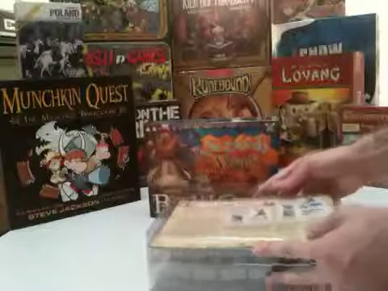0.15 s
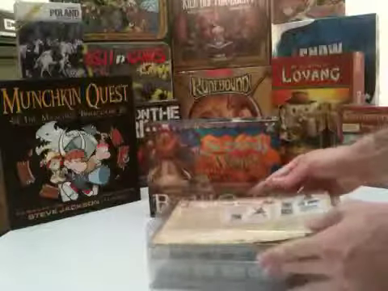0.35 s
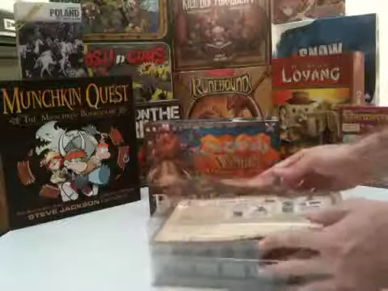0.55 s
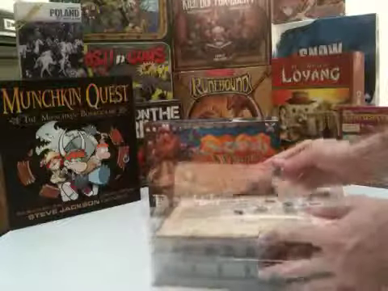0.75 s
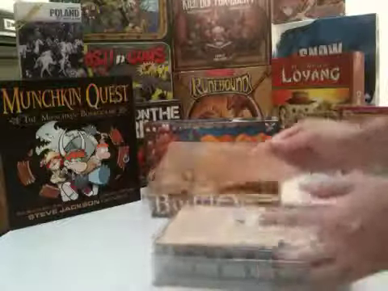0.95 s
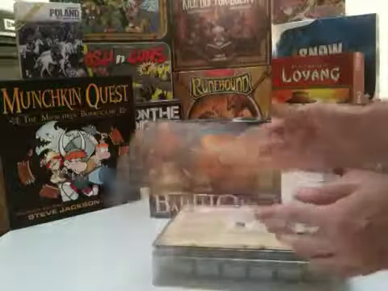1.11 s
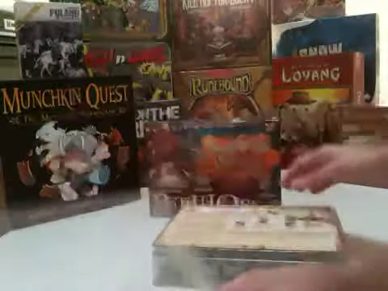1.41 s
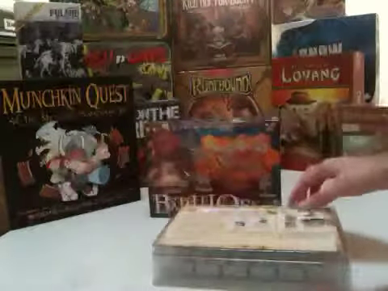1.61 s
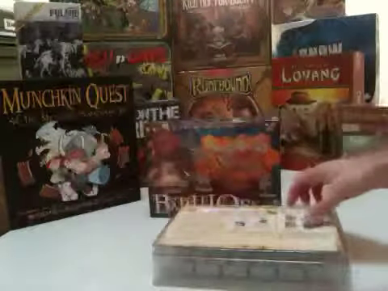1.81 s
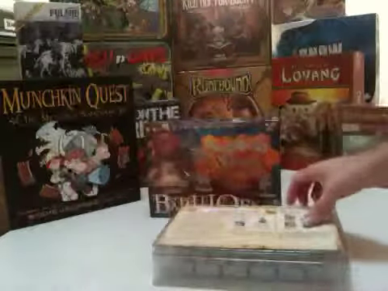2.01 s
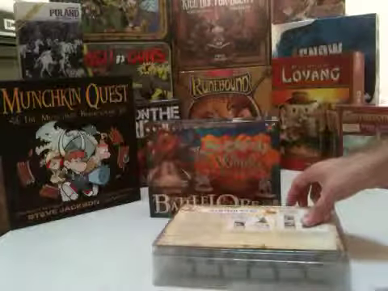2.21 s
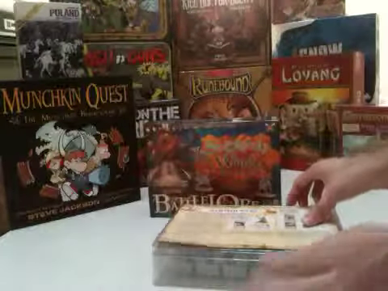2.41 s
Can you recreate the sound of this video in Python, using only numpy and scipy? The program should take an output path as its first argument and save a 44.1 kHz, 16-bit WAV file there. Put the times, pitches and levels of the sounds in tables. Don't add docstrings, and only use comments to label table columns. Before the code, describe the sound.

Hands work a thin plastic lid off a hollow box with soft scrapes, ticks and dull knocks, a near pause, then sharper taps and crisp paper snaps, close in a small room with steady hiss.

```python
import sys
import numpy as np
from scipy import signal
from scipy.fft import rfft, irfft
from scipy.io import wavfile
from scipy.ndimage import uniform_filter1d, minimum_filter1d

SR = 44100
rng = np.random.default_rng(int(sys.argv[2]) if len(sys.argv) > 2 else 0)


def transcribe(u):
    v = np.clip(np.atleast_2d(u).T, -1, 1)
    q = np.round(v * 32767).astype(np.int16)
    wavfile.write(sys.argv[1], SR, q)


def field_ratio(decibels):
    return 10 ** (np.asarray(decibels, dtype=float) / 20)


N = 112454

TICK_HZ, TICK_BODY_HZ = 11940, 3610


def band(x, hz, width_hz):
    return signal.lfilter(*signal.iirpeak(hz, hz / width_hz, fs=SR), x)


def ring(x, hz, t60):
    pole = np.exp(2j * np.pi * hz / SR - np.log(1000) / (t60 * SR))
    return signal.lfilter([1], [1, -pole], x).imag


def decay(t, t60):
    return 1000. ** (-t / t60)


def unit(x):
    return x / np.sqrt(np.mean(x ** 2))


def add(track, s, sound):
    i = int(s * SR)
    track[i:i + len(sound)] += sound[:N - i]


def curve(rows, index):
    return np.interp(np.arange(N) / SR, [r[0] for r in rows], [r[index] for r in rows])


def ragged(length, depth):
    return 1 + depth * unit(uniform_filter1d(rng.standard_normal(length), size=60))


def box(x):
    # (pitch [Hz], level [dB], t60 [s])
    box_tones = [(327, -6, 0.037), (433, 2.5, 0.028), (467.5, 3.5, 0.041), (609.4, 1, 0.053),
                 (780, 3, 0.031), (937, 2, 0.049), (1118, -2.5, 0.086), (1385, 0, 0.012), (1700, -6, 0.11)]
    detune, scatter_db = .05, 2.
    grip = rng.standard_normal((len(box_tones), 2))
    out = 0
    for k, (hz, db, t60) in enumerate(box_tones):
        tone = ring(x, hz * (1 + detune * grip[k, 1]), t60)
        out = out + (-1) ** k * field_ratio(db + scatter_db * grip[k, 0]) * tone
    return out


def slips(per_s):
    scatter_db = 2 * np.minimum(rng.exponential(size=N), 2)
    size = field_ratio(scatter_db) * np.tanh(rng.standard_normal(N))
    return size * (rng.random(N) < per_s / SR)


def slide():
    # (time [s], pressure [dB], dryness [dB])
    rubbing = [(0, -50, -13), (.2, -54.5, -8), (.5, -56, -12), (.54, -49.5, -9), (.81, -63.5, -11),
               (.856, -43, -12), (.862, -35.5, -18.5), (1.06, -53, 0.5), (1.08, -48.5, -13),
               (1.27, -64, -21), (1.3, -80, -41), (1.5, -83, -19), (1.865, -77, 5), (1.89, -62, -18),
               (2.03, -44, -11), (2.05, -41, -11), (2.2, -39, -16.5), (2.42, -61, -10.5)]
    slips_per_s, bursts_per_s, burst_db = 500, 280, 5.
    body_level_db, mid_level_db, dry_level_db = -13, -19, -3.5
    press = field_ratio(curve(rubbing, index=1))

    body = unit(sum(box(uniform_filter1d(slips(slips_per_s / 2), size=16)) for _ in range(2)))

    steps = np.tanh(rng.standard_normal(1000))
    bursts = field_ratio(burst_db * np.interp(np.arange(N) / SR * bursts_per_s, np.arange(1000), steps))
    fine = slips(12 * slips_per_s) * bursts
    bright = unit(band(band(fine, TICK_HZ, 11100.0), TICK_HZ, 11100.0))
    dull = unit(band(fine, TICK_BODY_HZ, 4100.0))
    rustle = bright + field_ratio(-7.0) * dull
    mid = unit(band(slips(4 * slips_per_s) * bursts, 2100.0, 2300.0))

    dryness = field_ratio(dry_level_db + curve(rubbing, index=2))
    return press * (field_ratio(body_level_db) * body + field_ratio(mid_level_db) * mid + dryness * rustle)


def hiss():
    # (pitch [Hz], level [dB per Hz])
    hiss_colour = [(20, -53), (60, -39), (130, 1), (340, 10.5), (1100, 2), (3600, -3.5), (6500, -5.5),
                   (13000, -3)]
    level_db = -61.5
    hz = np.maximum(np.arange(N // 2 + 1) * SR / N, 1)
    shape_db = np.interp(np.log(hz), np.log([r[0] for r in hiss_colour]), [r[1] for r in hiss_colour])
    spectrum = rfft(rng.standard_normal(N)) * field_ratio(shape_db) * (hz < 16500)
    return field_ratio(level_db) * unit(irfft(spectrum, N))


def ticks():
    # (time [s], peak level [dB], body level [dB], length [s])
    lid_ticks = [(0.037, -35, -26, 0.0034), (0.081, -35.5, -10.5, 0.0091), (0.142, -32.5, -11.5, 0.006),
                 (0.196, -37, -11, 0.0029), (.286, -34.5, -9, .003), (0.511, -40, 3.5, 0.0054),
                 (0.517, -39.5, 4, .004), (0.534, -34, -23, 0.0045), (0.569, -36, -11, 0.0026),
                 (0.702, -37, -9, .003), (0.826, -39.5, -5.5, 0.012), (0.859, -27, -22, 0.0013),
                 (0.869, -25, -22, 0.0039), (0.878, -28.5, -11, 0.014), (0.903, -28.5, -11.5, 0.014),
                 (0.916, -33.5, -4.5, 0.0068), (0.973, -39, -2, 0.0021), (1.027, -35, -5, 0.019),
                 (1.052, -42, -3, 0.0028), (1.552, -40, 0.5, 0.0022)]
    # (time [s], peak level [dB], body level [dB], length [s])
    paper_ticks = [(1.706, -34, -16, 0.0029), (1.719, -30.5, -15, 0.0035), (1.767, -30, -15, 0.0014),
                   (1.798, -33.5, -13, 0.0029), (1.803, -32, -13, 0.005), (1.8716, -33, -6, 0.0057),
                   (1.888, -36, -20, .002), (1.9765, -19, -22, 0.0009), (1.977, -30.5, -7.5, 0.003),
                   (2.0124, -19.5, -30, 0.0006), (2.0137, -19, -30, .0008), (2.038, -30.5, 2, 0.0027),
                   (2.1245, -30.5, -19, 0.0033), (2.156, -31, -29, 0.0008), (2.16, -25, -29, .0008),
                   (2.168, -40, -20, .001), (2.192, -27, -15, 0.001), (2.196, -31.5, -14, 0.0044),
                   (2.229, -26.5, -8, 0.001), (2.2375, -22.5, -27, 0.0013), (2.298, -41, -19, .002),
                   (2.2686, -26, -10, 0.0018), (2.34, -24.5, -10.5, 0.0015), (2.4247, -31, -10.5, 0.0054)]
    level_db, snap_db, width_hz = -10.5, 7.5, 6370
    out, t = np.zeros(N), np.arange(SR // 20) / SR
    for s, db, body_db, length in lid_ticks + paper_ticks:
        fade = t / max(length, .0003)
        crackle = np.exp(-fade) * (1 - np.exp(-4 * fade)) + np.exp(-8 * fade)
        burst = rng.standard_normal((2, len(t))) * crackle
        burst[:, 0] = field_ratio(snap_db) * min(1, 0.0028 / length)
        top = band(band(burst[0], TICK_HZ, width_hz), TICK_HZ, width_hz)
        body = field_ratio(body_db + 4.5) * band(burst[1], TICK_BODY_HZ, 4600.0)
        add(out, s, field_ratio(db + level_db) * (top + body))
    return out


def knocks():
    # (time [s], peak level [dB], pitch [Hz], hardness [dB])
    lid_knocks = [(0.139, -39, 477, -13), (0.163, -50.5, 476, -15), (0.377, -42.5, 370, -11.5),
                  (0.409, -49.5, 380, -9), (0.536, -46.5, 368, -14), (0.676, -49, 310, -28),
                  (0.771, -49, 720, -25), (0.855, -53, 470, -13), (0.868, -43, 480, 1.5),
                  (.8765, -40, 490, -14), (.883, -41.5, 428, -24), (0.890, -35.5, 400, -12),
                  (.903, -44, 527, -28), (0.921, -38.5, 400, -23), (.932, -46.5, 430, -21),
                  (.94, -54, 450, -25), (1.027, -38.5, 546, -7.5), (1.032, -42, 496, -10),
                  (1.04, -39, 359, -26), (1.069, -40.5, 403, -10), (1.082, -42, 406, -18),
                  (1.128, -43.5, 395, -30), (1.152, -42.5, 318, -35), (1.162, -45, 397, -28),
                  (1.178, -46, 308, -25), (1.244, -43.5, 380, -40), (1.283, -40.5, 386, -40),
                  (1.292, -40, 640, -57), (1.304, -36, 359, -44), (1.328, -39.5, 390, -52)]
    # (time [s], peak level [dB], pitch [Hz], hardness [dB])
    card_knocks = [(1.8703, -21.5, 602, -9.5), (1.8765, -39.5, 700, -5), (1.8845, -33.5, 560, -18),
                   (1.906, -35, 600, -34), (1.942, -42.5, 493, -7), (1.966, -49, 655, -26),
                   (2.001, -49, 620, -30), (2.036, -29.5, 530, -8.5), (2.045, -29, 490, -30),
                   (2.065, -39, 550, -29), (2.085, -38, 504, -30), (2.095, -22.5, 577, -13),
                   (2.098, -31.5, 556, -20), (2.103, -27.5, 590, -13.5), (2.1165, -29.5, 560, -1.5),
                   (2.121, -35, 540, -2), (2.13, -32, 475, -20), (2.153, -30.5, 410, -38),
                   (2.164, -36.5, 442, -11), (2.181, -31, 528, -27), (2.202, -37, 620, -13),
                   (2.235, -38, 450, -16), (2.287, -47, 576, -28), (2.338, -50, 507, -9)]
    # (pitch [Hz], level [dB], t60 [s])
    card_tones = [(1415, 4.5, .04), (1990, 12, 0.0083), (2300, -27, 0.009), (2900, -18, 0.013),
                  (3230, -32, 0.0097), (3800, -2, 0.013), (4950, -16, .01)]
    thud_db, box_db, edge_db = 5.5, -8, 1.5
    grit_db, card_db, crack_db = -9, 3.5, -3
    lag_s, edge_hz, crack_hz = .0018, 1650, 1460
    out, t = np.zeros(N), np.arange(SR // 10) / SR
    # its knocks, rise time [s], thud t60 [s]
    for rows, rise_s, thud_t60 in ((lid_knocks, 0.0013, 0.026), (card_knocks, 0.00042, 0.016)):
        rise = 1 - np.exp(-(t / rise_s) ** 2)
        for s, db, hz, hard_db in rows:
            thud = -rise * np.sin(2 * np.pi * hz * t) * decay(t, thud_t60)

            grit = rise * rng.standard_normal(len(t)) * decay(t, 0.048)
            rattle = 4 * band(band(grit, edge_hz, 910.0), edge_hz, 2300.0)
            tap = rng.standard_normal(len(t)) * decay(t, .005) + 6 * (t == 0)
            tones = sum(field_ratio(tone_db) * ring(tap, tone_hz, t60) for tone_hz, tone_db, t60 in card_tones)
            edge = field_ratio(grit_db) * rattle + field_ratio(card_db) * rise * tones / 40
            crack = field_ratio(crack_db) * 4 * rise * np.sin(2 * np.pi * crack_hz * t) * decay(t, 0.0055)
            hit = field_ratio(thud_db) * thud + field_ratio(edge_db + hard_db) * (edge + crack)
            add(out, s + lag_s, field_ratio(db) * hit)

            push = np.hanning(int(SR / hz / 1.94) + 2)
            push = np.pad(push / push.sum(), (0, len(t)))
            answer = band(box(push), hz, 0.8 * hz)
            add(out, s + lag_s + rise_s, field_ratio(db + box_db) * answer)
    return out


def scuffs():
    # (time [s], peak level [dB], pitch [Hz], length [s])
    scuff_events = [
        (0.46, -58.5, 770, 0.0072),
        (0.517, -52.5, 2185, 0.0042),
        (0.679, -61.5, 2045, 0.0081),
        (0.796, -58.5, 2160, 0.008),
        (1.718, -68.5, 3420, 0.015),
        (2.043, -38, 1430, 0.0053),
        (2.273, -56, 4750, 0.00091),
    ]
    out = np.zeros(N)
    t = np.arange(-SR // 30, SR // 30) / SR
    for s, db, hz, length in scuff_events:
        swell = ragged(len(t), .6) * np.exp(-(t / length) ** 2)
        chirp = np.sin(2 * np.pi * hz * t * (1 + 2.4 * t))
        add(out, s - 1 / 30, field_ratio(db) * swell * chirp)
    return out


def squeak():
    # (time [s], pitch [Hz], level [dB])
    whistle = [
        (.968, 2950, -60),
        (.973, 3150, -55),
        (.979, 3350, -51),
        (.985, 3680, -57),
        (.997, 3700, -56),
        (1.005, 3600, -59),
        (1.012, 3480, -68),
        (1.016, 3420, -70),
    ]
    t = np.arange(N) / SR
    on = (t > whistle[0][0]) & (t < whistle[-1][0])
    tone = np.sin(2 * np.pi * np.cumsum(curve(whistle, index=1)) / SR)
    return on * ragged(N, .33) * np.sqrt(2) * field_ratio(curve(whistle, index=2)) * tone


def room(x):
    t, step, out = np.arange(SR // 2) / SR, SR // 20, np.zeros(N)
    for start in range(0, N, step):
        noise = rng.standard_normal((2, len(t))) * (t > .003)
        low = signal.lfilter(*signal.butter(2, 2330, fs=SR), noise[0]) * decay(t, 0.44)
        tail = low + field_ratio(-11.5) * noise[1] * decay(t, 0.43)
        tail = tail / np.sqrt(np.sum(tail ** 2))
        piece = x[start:start + 2 * step]
        piece = piece * np.hanning(2 * step)[:len(piece)]
        add(out, start / SR, signal.fftconvolve(piece, tail))
    return out


def table_rumble(near):
    shake = unit(band(rng.standard_normal(N), 42.0, 79.0))
    moving = uniform_filter1d(np.abs(near), size=400) * shake
    return field_ratio(-52) * band(moving, 35.0, 86.0) * 10


def scene():
    near = slide() + ticks() + knocks() + scuffs() + squeak()
    rumble = table_rumble(near)
    mic_low_cut = signal.butter(3, 210, "high", fs=SR, output="sos")
    heard = signal.sosfilt(mic_low_cut, near + field_ratio(-11) * room(near))
    return (heard + rumble + hiss())[None]


def starve(x):
    margin_db, range_db, span_s = 9., 8., .046
    most_lost, lowest_hz = .5, 2600
    hz, t, z = signal.stft(x, SR, nperseg=256, noverlap=192)
    treble_power = np.mean(np.abs(z[hz > 8000]) ** 2, axis=0)
    bright_db = 10 * np.log10(uniform_filter1d(treble_power, size=3) + 1e-18)
    near_db = -minimum_filter1d(-bright_db, size=int(span_s * SR / 64))
    share = most_lost * np.clip((near_db - bright_db - margin_db) / range_db, 0, 1)
    patch = np.kron(rng.random((43, len(t) // 4 + 1)), np.ones((3, 4)))[:len(hz), :len(t)]
    lost = (patch < share) & (hz[:, None] > lowest_hz)
    return signal.istft(z * ~lost, SR, nperseg=256, noverlap=192)[1][:N]


def hush_before_hits(x):
    treble = signal.sosfiltfilt(signal.butter(4, (1600, 7000), "band", fs=SR, output="sos"), x)
    now = uniform_filter1d(np.abs(x), size=90)
    ahead = -minimum_filter1d(-now, size=601, origin=-300)
    rise_db = 20.
    keep = uniform_filter1d(np.clip(now / ahead * field_ratio(rise_db), 0, 1) ** 4, size=60)
    return x - (1 - keep) * treble


def low_pass(x):
    return signal.sosfilt(signal.butter(12, 16670, fs=SR, output="sos"), x)


def record(dry):
    x = signal.sosfilt(signal.ellip(6, .3, 28, 15750, fs=SR, output="sos"), dry)
    mix = starve(hush_before_hits(x)[0])[None]
    return low_pass(mix)


dry = scene()
out = record(dry)
transcribe(out)
```